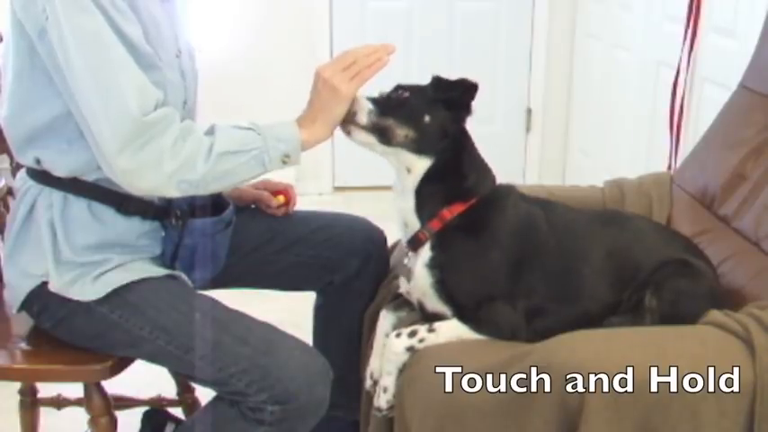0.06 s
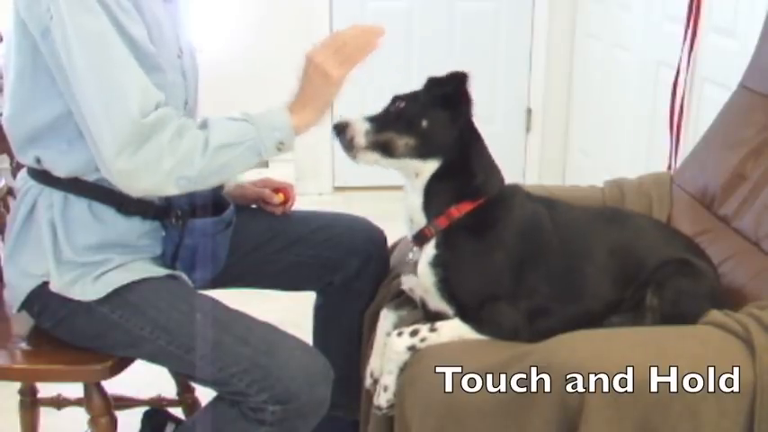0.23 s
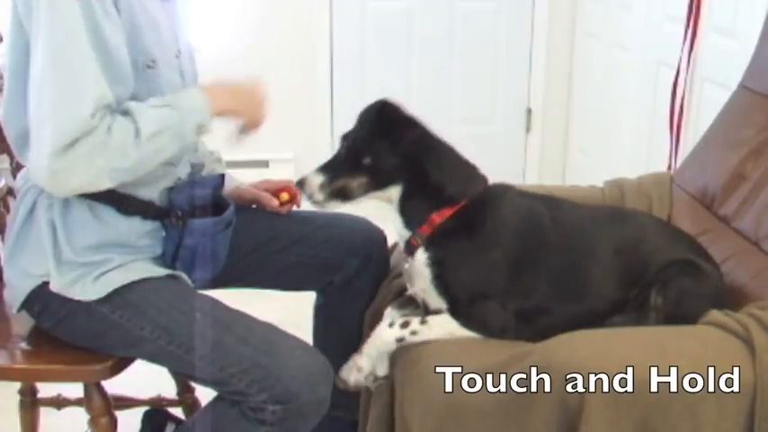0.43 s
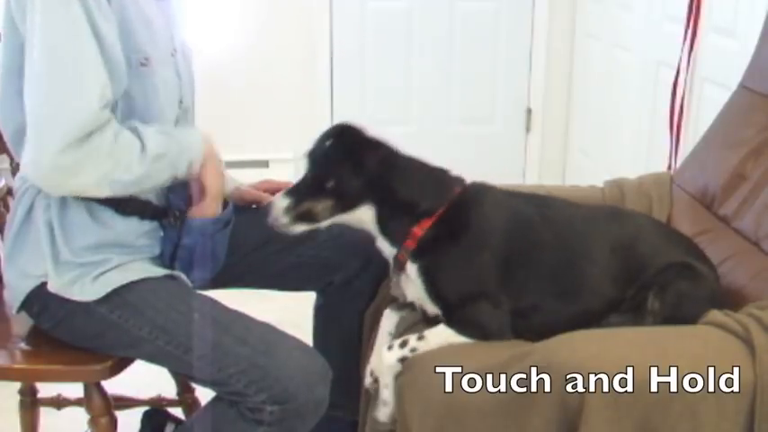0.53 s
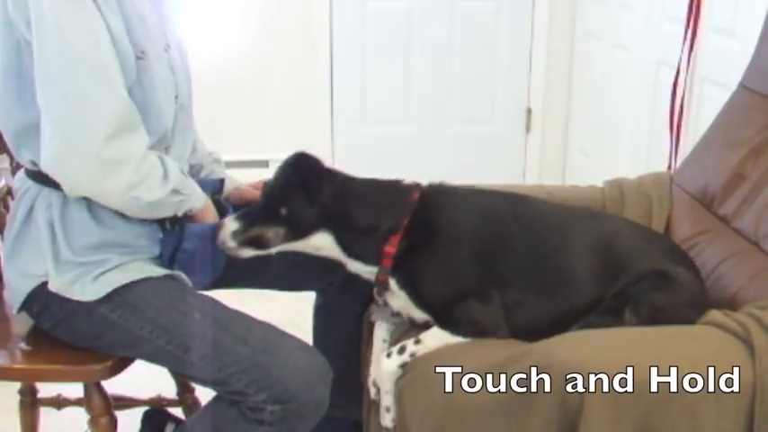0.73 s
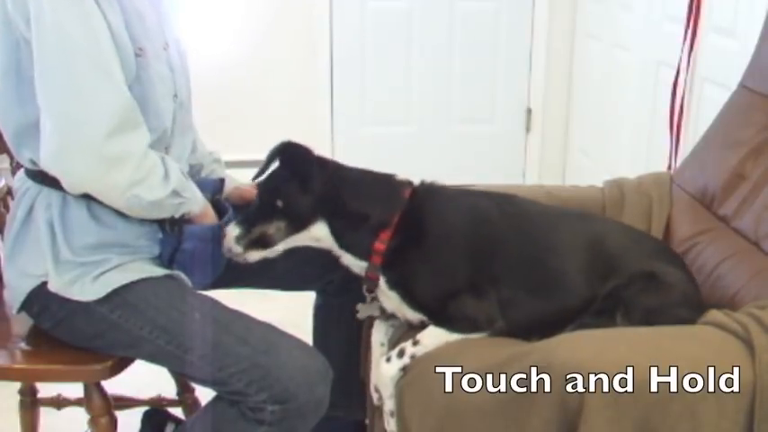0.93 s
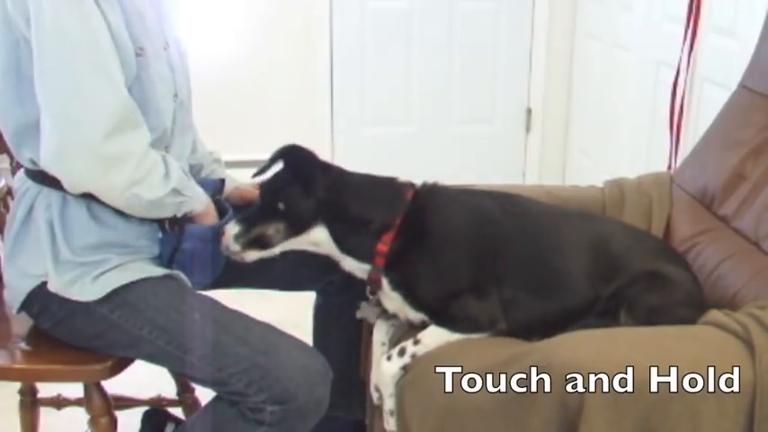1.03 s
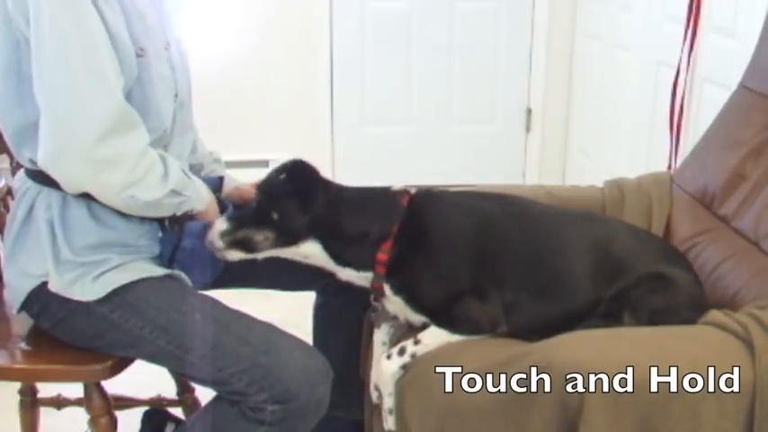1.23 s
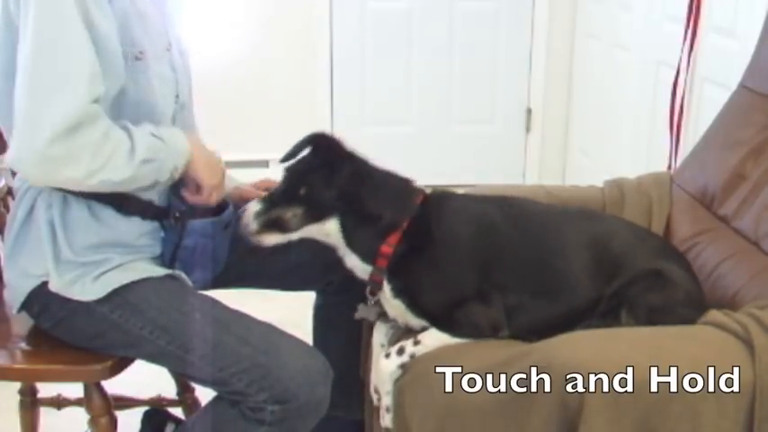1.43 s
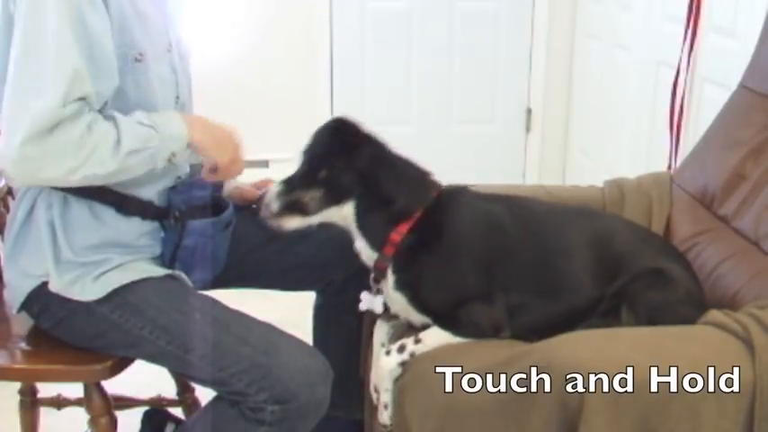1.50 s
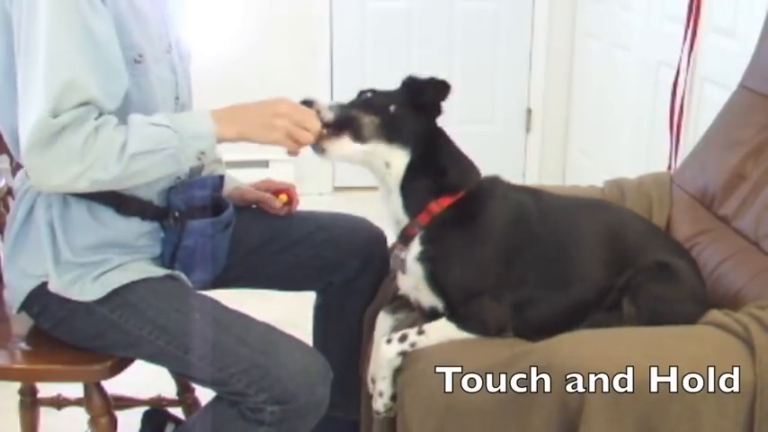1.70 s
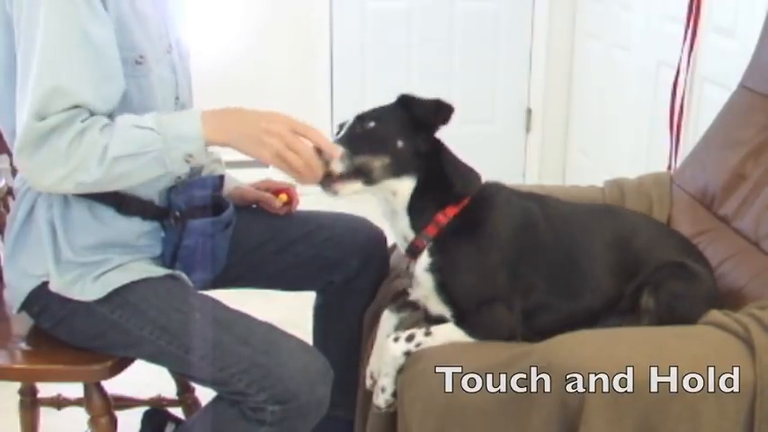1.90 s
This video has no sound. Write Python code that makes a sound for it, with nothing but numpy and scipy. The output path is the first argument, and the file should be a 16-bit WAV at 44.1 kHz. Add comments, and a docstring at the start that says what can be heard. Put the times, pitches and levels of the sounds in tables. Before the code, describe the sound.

A dog-training clicker snaps sharply at about 0.2 seconds and springs back at 0.35 seconds, each metallic click ringing briefly in a living room. A faint dry tick comes at 0.7 seconds, and clothes rustle very softly on and off until about 2 seconds as a treat is taken from a pouch. Quiet room noise, a low hum and a faint thin whine lie underneath.

```python
"""A dog-training clicker snaps down and springs back, heard in a living room that rings on brightly.
Its steel tongue cracks and rings at each flip; the microphone gets the direct sound, then the walls.
Clothes rustle faintly as a treat is taken from a pouch, with one dry tick. Behind lie room noise,
a low drone, mains hum and a thin whine. The camera's gain control ducks at each snap and recovers."""
import sys
import numpy as np
from scipy import signal
from scipy.fft import rfft, irfft, next_fast_len
from scipy.io import wavfile
from scipy.ndimage import uniform_filter1d, minimum_filter1d, map_coordinates

SR = 44100
rng = np.random.default_rng(int(sys.argv[2]) if len(sys.argv) > 2 else 0)


def persist_wave(psi):
    """Save psi, clipped to +-1, as 16-bit WAV."""
    counts = np.round(np.clip(psi, -1, 1) * 32767).astype(np.int16)
    wavfile.write(sys.argv[1], SR, np.atleast_2d(counts).T)


N = 85995

# snaps of the tongue (overall gain [dB], ring in the room [dB], crack [dB], crack in the room [dB])
PRESS_GAINS = (8, 1.5, -8.5, -2)
RELEASE_GAINS = (10, 2.5, -8, -1.5)
# modes of the tongue (frequency [Hz], t60 [s], gain to the microphone [dB], gain into the room [dB])
BENT_MODES = [(1993, 0.013, -11, -15.5), (2830, 0.0021, -36, -29.5), (3265, 0.0059, -17, -13.5),
              (3670, 0.0065, -6.5, -8), (4440, 0.0078, -15, -12.5), (5410, .009, -13.5, -16.5),
              (6150, .012, -13, -16.5), (6444, 0.008, -7, -4.5), (7130, 0.0083, -5, -9)]
RELAXED_MODES = [(1920, 0.022, -23.5, -27), (3240, 0.0025, -14, -13), (3922, 0.02, -26, -18),
                 (4135, 0.014, -22, -16), (4320, 0.012, -16, -11.5), (4450, 0.0047, -6.5, -16),
                 (5170, 0.012, -13.5, -14), (6070, 0.0026, -20.5, -3), (6640, 0.0055, -7, -16),
                 (7130, 0.0047, -1.5, -11)]
# the crack's spectrum, and the small body's weak bass radiation (frequency [Hz], gain [dB])
CRACK_SPECTRUM = [(100, 10.5), (1100, -1), (2000, 3.5), (3000, 0), (5000, 5.5), (7500, 3), (9000, -1.5)]
RADIATION = [(300, -22), (1100, -14.5), (1600, -6), (2000, -4), (8000, -1.5)]
# first echoes off nearby walls (delay [s], gain [dB])
WALL_ECHOES = [(.006, -15), (.0085, -31)]
# decay of the living room (frequency [Hz], t60 [s])
ROOM_T60 = [(500, 0.89), (2000, 0.47), (4200, 0.46), (7000, .43)]
# rustles of sleeve and pouch (time [s], width [s], level [dB])
RUSTLES = [(0.152, 0.034, -56.5), (.75, 0.0394, -52), (1.255, 0.027, -51), (1.34, .025, -58.5),
           (1.45, .045, -51), (1.54, 0.041, -58.5), (1.84, 0.03, -65.5), (1.91, 0.06, -54.5)]
# spectra of cloth, shifting bodies, room noise and room resonance (frequency [Hz], gain [dB])
CLOTH_SPECTRUM = [(60, -3), (200, 3), (700, 6), (1500, 2.5), (3000, -5.5), (7000, -11.5), (9000, -21)]
SHUFFLE_SPECTRUM = [(100, -33), (300, -1.5), (550, -2), (900, -8), (1500, -10.5), (4000, -27)]
AIR_SPECTRUM = [(20, -36), (50, 2.5), (86, -10), (130, -3.5), (250, -8.5), (600, -7.5), (1580, -13),
                (3500, -13), (6500, -14.5), (8200, -22.5)]
DRONE_SPECTRUM = [(90, -21.5), (150, -24), (180, -5.5), (210, -10), (280, -33)]
# swells of the shifting bodies, the room resonance and the whine (time [s], level [dB])
SHUFFLE_LEVEL = [(0, -54.5), (.15, -50.5), (.25, -53.5), (.6, -56.5), (.74, -53.5), (.9, -52),
                 (1.15, -53.5), (1.45, -54), (1.7, -51.5), (1.95, -52.5)]
DRONE_LEVEL = [(0, -57.5), (.2, -50.5), (.3, -47.5), (.42, -52), (.7, -54), (1.2, -59), (1.4, -50.5),
               (1.7, -58), (1.81, -49.5), (1.95, -58)]
WHINE_LEVEL = [(0, -64.5), (1.0, -68.5), (1.2, -64), (1.45, -67), (1.6, -63), (1.95, -62)]
# partials of the mains hum (frequency [Hz], level [dB])
HUM_PARTIALS = [(59.2, -61.5), (118.5, -69.5), (177.6, -59), (414.5, -67), (2234, -67.5)]
# treble roll-off of the microphone (frequency [Hz], gain [dB])
MIC_RESPONSE = [(7000, -1.5), (7600, -9.5), (8100, -16), (8400, -37)]

PRESS_S, RELEASE_S, TICK_S = 0.2072, 0.3461, 0.702


def amp(db):
    """Decibels to gain."""
    return 10 ** (np.asarray(db) / 20)


def unit(x):
    """Scale to rms 1."""
    return x / np.sqrt(np.mean(x ** 2) + 1e-20)


def along(points, hz):
    """(Hz, value) points on a log axis."""
    f, v = np.transpose(points)
    return np.interp(np.log(hz + 1), np.log(f + 1), v)


def filtered(x, response):
    """x times a response of frequency."""
    n = x.shape[-1]
    m = next_fast_len(n + SR // 4)
    return irfft(rfft(x, m) * response(np.fft.rfftfreq(m, 1 / SR)), m)[..., :n]


def noise(spectrum, size=N):
    """Coloured noise of rms 1."""
    return unit(filtered(rng.standard_normal(size), lambda hz: amp(along(spectrum, hz))))


def wobble(rate):
    """A smooth random curve, rate knots a second."""
    return map_coordinates(rng.standard_normal(int(N * rate / SR) + 4), [np.arange(N) * rate / SR])


def placed(x, s):
    """x starting at time s on the scene's timeline."""
    return np.pad(x, (max(round(s * SR), 0), N))[:N]


def clicker_snap(start_s, gains, modes, attack_s=.0003, crack_t60_s=.0026, room_gap_s=.002):
    """The tongue flips with a crack and rings for a few milliseconds; walls and room carry it on."""
    snap_db, room_ring_db, crack_db, room_crack_db = gains
    t = np.arange(SR // 20) / SR
    fade = lambda t60: np.exp(-np.log(1000) * t / t60)
    rise = 1 - np.exp(-t / attack_s)
    rings = np.array([fade(t60) * np.sin(2 * np.pi * hz * t) for hz, t60, _, _ in modes])
    mode_gains = amp(np.array(modes)[:, 2:].T)
    to_mic, to_room = rise * (mode_gains @ rings)
    crack = amp(crack_db) * rise * fade(crack_t60_s) * noise(CRACK_SPECTRUM, size=len(t))
    direct = placed(to_mic + crack, start_s)
    echoes = sum(amp(db) * placed(to_room, start_s + delay) for delay, db in WALL_ECHOES)
    tail_s = start_s + room_gap_s
    room_crack = filtered(placed(room_tail(), tail_s), lambda hz: amp(along(CRACK_SPECTRUM, hz)))
    room_ring = placed(signal.fftconvolve(to_room, room_tail()), tail_s)
    snap = direct + echoes + amp(room_ring_db) * room_ring + amp(room_crack_db) * room_crack
    return amp(snap_db) * filtered(snap, lambda hz: amp(along(RADIATION, hz)))


def room_tail(build_s=.0027):
    """The living room's diffuse tail, of energy 1; each frequency dies at its own speed."""
    hz, t, bands = signal.stft(rng.standard_normal(SR), SR, nperseg=256)
    decay = amp(-60 * t / along(ROOM_T60, hz)[:, None])
    tail = signal.istft(bands * decay, SR, nperseg=256)[1]
    tail *= 1 - np.exp(-np.arange(len(tail)) / SR / build_s)
    return tail / np.linalg.norm(tail)


def rustles(rough_db=2):
    """Uneven swells of rubbing cloth over the dull sound of bodies shifting on the furniture."""
    t = np.arange(N) / SR
    swells = sum(amp(db) * np.exp(-.5 * ((t - s) / width) ** 2) for s, width, db in RUSTLES)
    shuffle = amp(np.interp(t, *np.transpose(SHUFFLE_LEVEL))) * noise(SHUFFLE_SPECTRUM)
    cloth = unit(noise(CLOTH_SPECTRUM) * amp(rough_db * wobble(150)))
    return shuffle + swells * cloth


def tick(level_db=-41.5, t60_s=.033):
    """One faint dry tick: a fast-dying burst of noise, coloured like the crack."""
    t = np.arange(SR // 10) / SR
    return amp(level_db) * np.exp(-np.log(1000) * t / t60_s) * noise(CRACK_SPECTRUM, size=len(t))


def mains_hum(waver_db=1.2, drift_rad=.3):
    """Mains hum in the room; each partial wavers in level and phase."""
    t = np.arange(N) / SR
    hum = np.zeros(N)
    for hz, db in HUM_PARTIALS:
        peak = np.sqrt(2) * amp(db + waver_db * wobble(8.83))
        hum += peak * np.sin(2 * np.pi * hz * t + drift_rad * wobble(11.74))
    return hum


def whine(hz=2901, drift_rad=.1):
    """A thin, faint tone that swells and sinks."""
    t = np.arange(N) / SR
    peak = np.sqrt(2) * amp(np.interp(t, *np.transpose(WHINE_LEVEL)))
    return peak * np.sin(2 * np.pi * hz * t + drift_rad * wobble(10))


def room_tone(air_db=-51.5):
    """Steady room noise and hiss, with the swelling drone of a low room resonance."""
    t = np.arange(N) / SR
    drone = amp(np.interp(t, *np.transpose(DRONE_LEVEL))) * noise(DRONE_SPECTRUM)
    return amp(air_db) * noise(AIR_SPECTRUM) + drone


def gain_control(dry, limit_db=-4.5, look_s=.0005, hold_s=.024, recover_db_per_s=71):
    """The gain drops at once on a peak over the limit, holds, and climbs back steadily."""
    peak_db = 20 * np.log10(np.abs(dry).max(axis=0) + 1e-9)
    over_db = np.maximum(peak_db - limit_db, 0)
    hold, look = int(hold_s * SR), int(look_s * SR)
    needed_db = minimum_filter1d(-over_db, hold, origin=(hold - 1) // 2)
    climb_db = recover_db_per_s * np.arange(N) / SR
    gain_db = climb_db + np.minimum.accumulate(needed_db - climb_db)
    smooth_db = uniform_filter1d(minimum_filter1d(gain_db, look), look)
    return dry * amp(smooth_db)


def scene():
    """Press and release over the quiet room, heard from one spot, the same in both channels."""
    press = clicker_snap(PRESS_S, PRESS_GAINS, BENT_MODES)
    release = clicker_snap(RELEASE_S, RELEASE_GAINS, RELAXED_MODES)
    background = mains_hum() + whine() + room_tone()
    mono = press + release + rustles() + placed(tick(), TICK_S) + background
    return np.array([mono, mono])


def record(dry, top_hz=8450):
    """At the camera: the gain ducks on each snap; the microphone's treble rolls off to a hard cut."""
    return filtered(gain_control(dry), lambda hz: amp(along(MIC_RESPONSE, hz)) * (hz < top_hz))


dry = scene()
out = record(dry)
persist_wave(out)
```